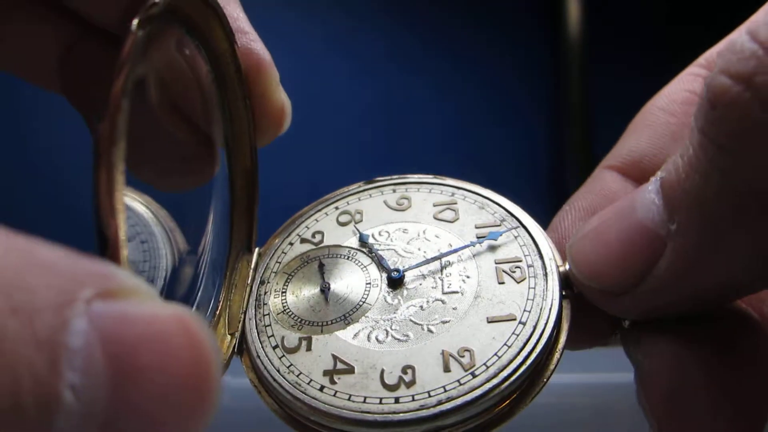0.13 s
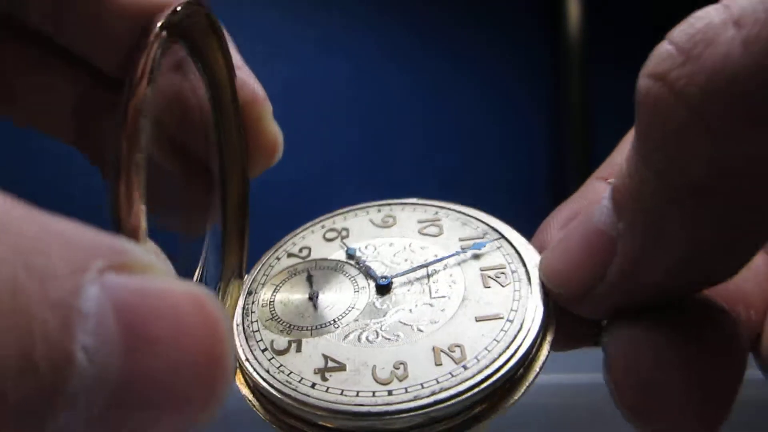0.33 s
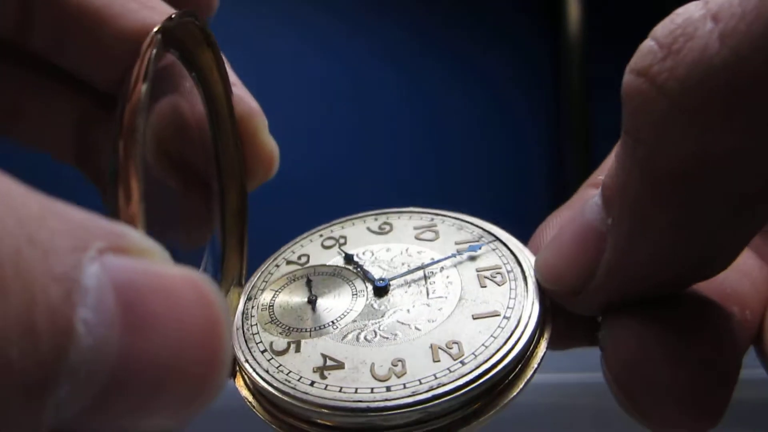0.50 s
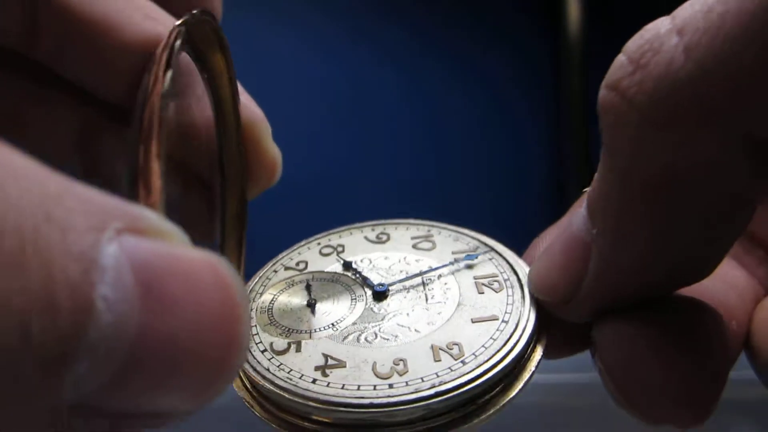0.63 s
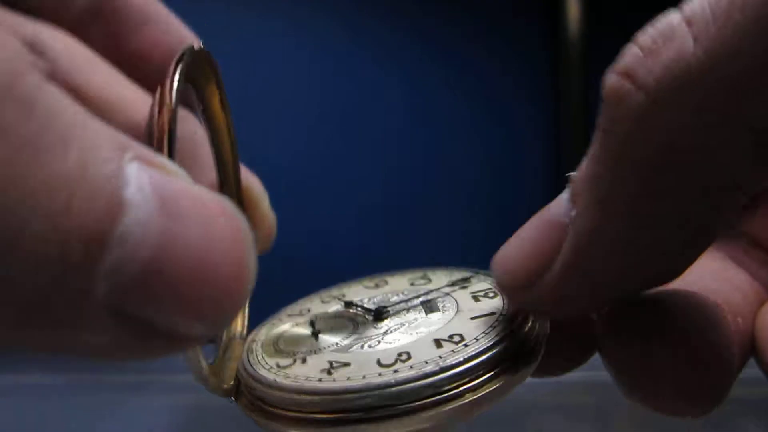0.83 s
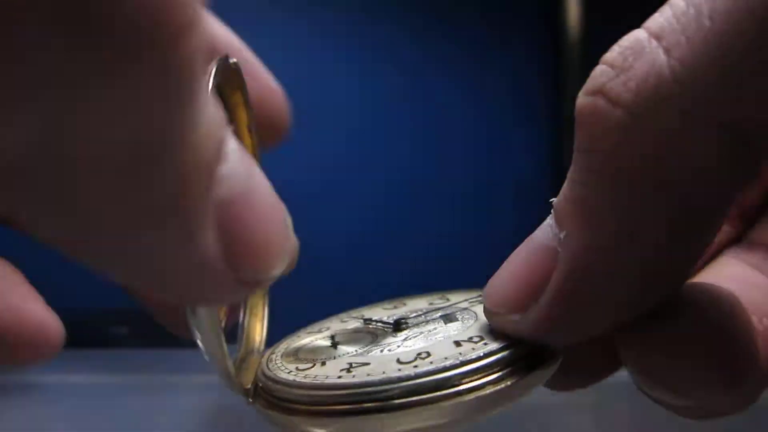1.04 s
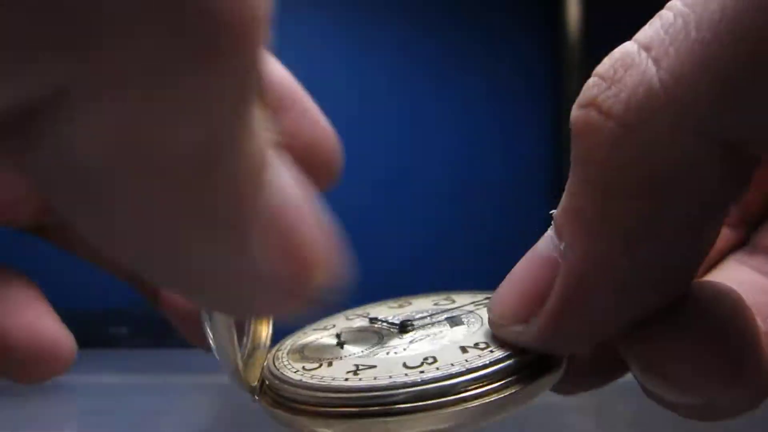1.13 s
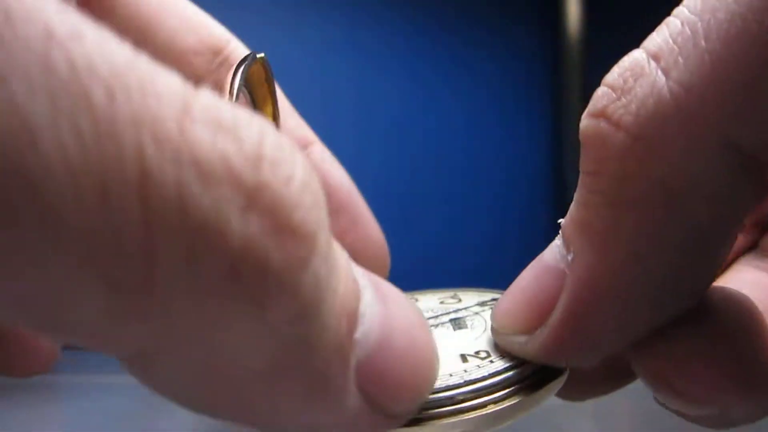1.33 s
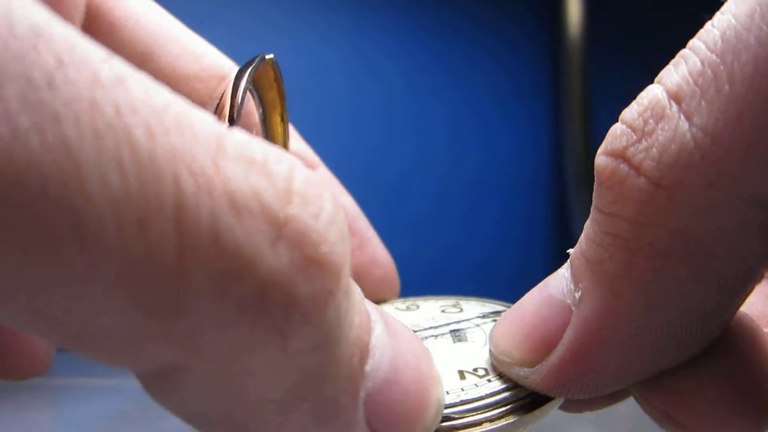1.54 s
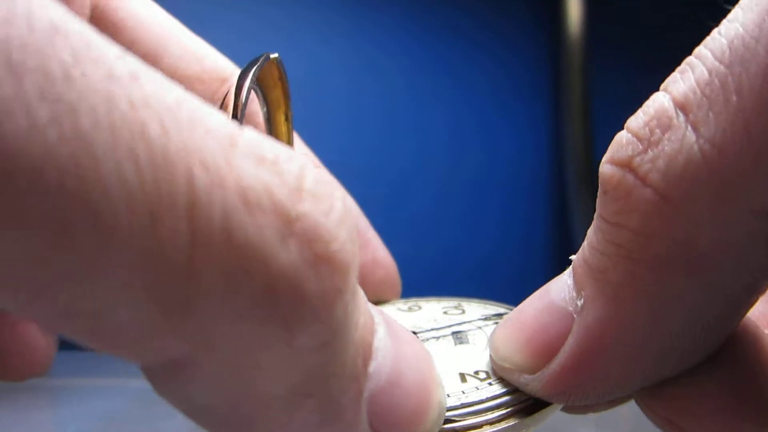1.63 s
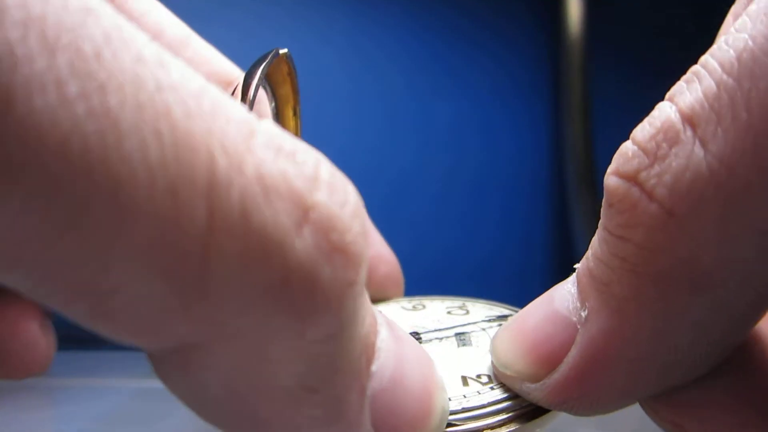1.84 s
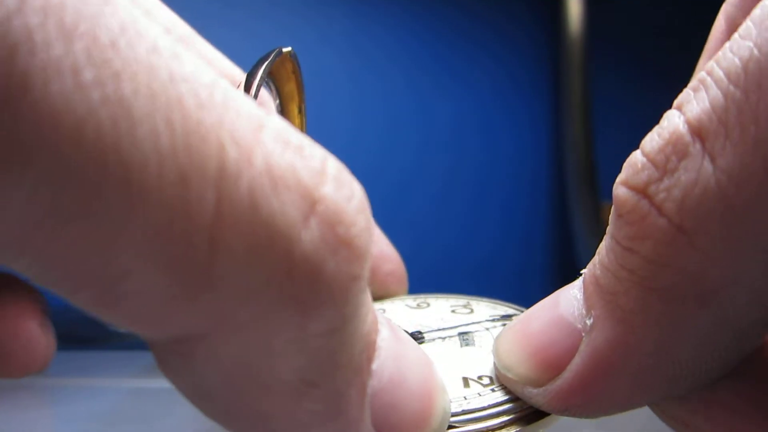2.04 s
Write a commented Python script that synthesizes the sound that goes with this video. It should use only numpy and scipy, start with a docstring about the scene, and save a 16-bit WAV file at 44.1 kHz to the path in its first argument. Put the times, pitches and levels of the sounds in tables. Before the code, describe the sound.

A pocket watch's metal cover clicks and snaps close by in a small quiet room. At 0.2 seconds comes a knock with a brief bright ring. Lighter clicks and taps follow around 0.7, 0.9 and 1.2 seconds, with soft fingertip rubbing. The loudest, sharpest snap lands near 1.5 seconds and a second at 1.6. Very faint ticking, five beats a second, runs underneath with low room noise.

```python
"""A faint tick and a rub of fingertips, then a pocket watch's hinged cover snaps and rings close by.
Fingers knock and rub the case, each impact exciting its damped modes, while the escapement ticks five
times a second in a small quiet room. The background drops out briefly before the second snap.
Gain control ducks the sound after the snaps and lets the room noise return slowly."""
import sys
import numpy as np
from scipy import signal
from scipy.fft import rfft, irfft
from scipy.io import wavfile
from scipy.ndimage import uniform_filter1d

SR = 44100
rng = np.random.default_rng(int(sys.argv[2]) if len(sys.argv) > 2 else 0)


def generate_wav(signal):
    """Clip the signal to [-1, 1] and save it as 16-bit WAV at the path in sys.argv[1]."""
    frames = np.transpose(np.atleast_2d(signal))
    scaled = np.clip(frames, -1, 1) * 32767
    pcm = np.round(scaled).astype(np.int16)
    wavfile.write(sys.argv[1], SR, pcm)


N = 92610


def contacts():
    """Impact excitation: the case rings and rattles. Returns the direct sound and the feed to the room."""
    # contacts on the case: (time [s], rise [s], rattle length factor, ring pitch factor,
    # then level [dB] in each band: push, thump, knock, clack, click, snap, fizz)
    impacts = [ (0.2117, 0.00031, 1.06, 0.74, -42, -22.5, -28, -28.5, -24, -38, -46),
               (0.2137, 0.00069, 1.3, 1.01, -28, -14.5, -25, -20, -26, -23, -28.5),
               (.2335, .0005, .8, 1., -70, -67, -55, -47, -53, -60, -54),
               (0.408, 0.00077, 1.4, 0.71, -64, -55, -62.5, -70, -57, -74, -77),
               (.7263, 0.00037, 0.86, .97, -56, -30.5, -30.5, -51, -69, -48.5, -55),
               (.7670, 0.00038, 1.3, 1.05, -67, -34.5, -53, -49, -62, -62, -72),
               (.8695, 0.0001, 1.6, .9, -56, -29, -50, -34, -38.5, -38, -49),
               (.8738, 0.00016, 1.74, .95, -53, -27.5, -34, -40, -45.5, -41.5, -57),
               (1.1152, 0.00026, 0.8, 1., -67, -60, -68, -59.5, -54, -55.5, -63),
               (1.1363, .001, 3.3, .9, -35.5, -40, -48, -59, -51, -73, -65),
               (1.1810, 0.0011, 1.2, 1., -56, -40.5, -48.5, -50.5, -59, -60, -77),
               (1.1980, 0.00021, 2.3, .72, -46, -41, -36.5, -62, -70, -75, -72),
               (1.4686, 0.000033, 0.54, 0.96, -24, -34.5, -23.5, -18.5, -22.5, -26, -30.5),
               (1.4697, 0.00061, 0.92, 0.63, -23, -22.5, -46, -29, -28, -33, -34.5),
               (1.6132, 0.00024, 0.91, 1., -54, -28.5, -21, -16, -32.5, -36, -43),
               (1.773, 0.00032, .7, 1., -51, -66, -53.5, -59, -76, -72, -68), ]
    # response of each band: (low edge [Hz], high edge [Hz], rattle t60 [s],
    # rattle gain [dB], ring gain [dB], room gain [dB])
    bands = [(25, 136, 0.024, -11, -8, -21), (137.4, 325, .035, -1.5, -1, -17.5),
             (306, 767, 0.022, -2, 0.5, -13.5), (890, 2100, .018, -4, 1, -20),
             (2200, 4440, 0.017, -3.5, -8, -22), (4900, 7500, 0.0056, -6, -16.5, -30),
             (8360, 13400, .012, -2.5, -17, -22)]
    # modes of the watch held against the table: (frequency [Hz], relative level [dB], t60 [s])
    body_modes = [(70, 0, .018), (162, -6, 0.016), (257.4, -7.5, 0.044), (422, -4.5, 0.038),
                  (515, 4.5, 0.038), (691, 6.5, 0.045), (1091, 7, 0.011), (1317, 1, 0.02),
                  (1664, -4.5, 0.0074), (2063, -32, 0.042), (2650, 7, 0.013), (3360, -13, 0.02),
                  (3674, -3, 0.039), (4920, -8.5, 0.011), (5000, -21, 0.005), (6440, -9, 0.025),
                  (8960, 13.5, 0.0083), (11300, -9, 0.011), (12290, -13, 0.01)]
    direct, to_room, t = np.zeros(N), np.zeros(N), np.arange(8192) / SR
    impulse = 1. * (t == 0)
    for time, rise, length, pitch, *levels in impacts:
        onset = 1 - np.exp(-t / rise)
        for db, (low, high, t60, rattle_db, ring_db, room_db) in zip(levels, bands):
            bandpass = signal.butter(2, [low, high], "band", fs=SR, output="sos")
            bass_cut = signal.butter(2, 0.91 * low, "high", fs=SR)
            chatter = rng.standard_normal(len(t)) * onset * amp(-60 * t / (t60 * length))
            rattle = burst(signal.sosfilt(bandpass, chatter))
            modes = [mode for mode in body_modes if low <= mode[0] < high]
            body = burst(signal.lfilter(*bass_cut, onset * ring(modes, t, pitch)))
            add(direct, time, amp(db + rattle_db) * rattle + amp(db + ring_db) * body)
            pulse = signal.sosfilt(bandpass, signal.sosfilt(bandpass, impulse))
            add(to_room, time, amp(db + room_db) * burst(pulse))
    return direct, to_room


def stops():
    """Sudden deceleration: catch and cover each radiate one pressure pulse on hitting their stops."""
    # hard stops of metal on metal: (time [s], pulse width [s], level [dB])
    hits = [(1.4686, 0.00021, -4.5), (1.614, 0.00027, -16)]
    out, t = np.zeros(N), np.arange(1024) / SR
    for time, width, db in hits:
        u = t / width
        add(out, time, -amp(db) * (1 - u) * np.exp(-u))
    return out


def cover(fast_t60=0.043, linger_db=-23):
    """Free vibration: the thin sprung cover loses most of its ring at once, then lingers faintly."""
    # the cover left free to ring: (time [s], level [dB])
    clinks = [(0.2169, -22), (0.8746, -53)]
    # modes of the cover: (frequency [Hz], relative level [dB], t60 of the lingering ring [s])
    modes = [(2075, -11.5, 0.52), (3080, 0, 0.18), (5216, -26, .19), (6765, 1, 0.25), (7881, -22, .22),
             (8269, -18, .19), (10480, -20, 0.29), (14880, -19, .14)]
    out, t = np.zeros(N), np.arange(SR // 2) / SR
    damping = amp(-60 * t / fast_t60) + amp(linger_db)
    for time, db in clinks:
        add(out, time, amp(db) * damping * ring(modes, t))
    return out


def tinks(rise_s=0.00027):
    """Damped oscillation: each struck part of the watch or its support gives one short note."""
    # struck parts: (time [s], frequency [Hz], level [dB], t60 [s])
    notes = [(.2140, 242.7, -6.5, 0.033), (0.213, 560, -22, 0.031), (0.2343, 3200, -25.5, 0.012),
             (.7265, 1186, -29, 0.019), (0.871, 2650, -32, 0.026), (0.8723, 3070, -34, 0.011),
             (0.8718, 3680, -34, 0.022), (0.8741, 245, -22.5, 0.035), (1.1132, 2620, -42.5, 0.02),
             (1.1145, 11840, -45, 0.012), (1.1971, 423, -22, 0.015), (1.4687, 1340, -12.5, 0.013),
             (1.4715, 715, -14.5, 0.031), (1.471, 8470, -32, 0.02), (1.6139, 1770, -12, .012),
             (1.6140, 3640, -24.5, 0.024), (1.6140, 6700, -31, 0.022)]
    out, t = np.zeros(N), np.arange(4096) / SR
    onset = 1 - np.exp(-t / rise_s)
    for time, *mode in notes:
        add(out, time, onset * ring([mode], t))
    return out


def ticks(hold_s=0.0043, t60=0.018, ring_db=-7.5):
    """Periodic impact: every beat of the escapement gives a bright rattle with a trace of ring."""
    # beats of the escapement: (time [s], level [dB], ring frequency [Hz])
    beats = [(0.0182, -50, 8950), (0.4172, -52.5, 8660), (.6180, -60, 9200), (.8150, -52.5, 15300),
             (1.0200, -60, 8250), (1.2186, -48, 14600), (1.4222, -54, 10300), (1.619, -54, 9300),
             (1.8212, -58.5, 9270), (2.019, -50, 10670)]
    # spectrum of the rattle: (frequency [Hz], relative level [dB])
    spectrum = [(100, -34), (1000, 9), (3500, -4), (7500, -1), (9200, 7.5), (12500, -1.5), (15000, 2.5),
                (17000, -21)]
    out, t = np.zeros(N), np.arange(2048) / SR
    fade = amp(-60 * np.maximum(t - hold_s, 0) / t60)
    for time, db, hz in beats:
        rattle = noise(lambda f: amp(curve_at(spectrum, f)), len(t))
        tone = amp(ring_db) * 2 * np.sin(2 * np.pi * hz * t)
        add(out, time, amp(db) * burst(fade * (rattle + tone)))
    return out


def rubs(grain_db=3, grain_hz=150):
    """Sliding friction: skin on the case makes soft, grainy swells of noise."""
    # fingertip strokes: (time [s], duration [s], level [dB], spectral tilt [dB/octave])
    strokes = [(0.038, .17, -55, -2.5), (0.103, 0.062, -56.5, 8), (0.402, 0.047, -55, 5.5),
               (.64, 0.073, -56.5, -3), (0.781, 0.18, -53, -13), (0.894, 0.068, -63, -13),
               (1.132, 0.16, -71, 10), (1.374, 0.042, -55.5, -2), (2.042, 0.064, -56.5, -8)]
    # friction spectrum before the tilt: (frequency [Hz], relative level [dB])
    spectrum = [(40, -28), (200, -6.5), (600, 3.5), (1200, -2), (3000, -17), (6000, -35.5), (16000, -53)]
    out, t = np.zeros(N), np.arange(SR // 2) / SR
    for time, duration, db, tilt in strokes:
        hiss = noise(lambda f: amp(curve_at(spectrum, f) + tilt * np.log2(np.clip(f, 200, 5000))), len(t))
        grain = amp(grain_db * noise(lambda f: 1 / (1 + (f / grain_hz) ** 2), len(t)))
        swell = np.sin(np.pi * np.minimum(t / duration, 1))
        add(out, time, amp(db) * hiss * grain * swell)
    return out


def room(x, delay_s=0.0026, build_s=0.0055):
    """Reverberation: dense reflections form a short tail whose decay depends on frequency."""
    # reverberation time of the room: (frequency [Hz], t60 [s])
    decay_times = [(100, 0.3), (400, 0.37), (1200, 0.23), (4000, 0.29), (14000, 0.27)]
    hz, t, spectrogram = signal.stft(rng.standard_normal(SR // 2), SR, nperseg=256)
    decay = amp(-60 * t / curve_at(decay_times, hz)[:, None])
    tail = signal.istft(spectrogram * decay, SR, nperseg=256)[1]
    tail *= np.clip((np.arange(len(tail)) / SR - delay_s) / build_s, 0, 1)
    return signal.fftconvolve(x, tail / np.linalg.norm(tail))[:N]


def room_noise(broadband_db=-54):
    """Stationary noise: a low broadband bed, with narrow bands heard as hums and a thin whine."""
    # spectrum of the bed: (frequency [Hz], relative level [dB])
    spectrum = [(15, -41), (25, -10.5), (70, -8.5), (87, -6), (135, -2.5), (197, -6.5), (238, -8),
                (330, -14.5), (600, -16.5), (878, -17), (1090, -16.5), (2670, -26.5), (8140, -31.5),
                (15200, -39.5), (16500, -65)]
    # narrow bands: (centre frequency [Hz], bandwidth [Hz], level [dB])
    bands = [(120, 32, -66.5), (1102, 50, -69.5), (7910, 180, -75)]
    hums = sum(amp(db) * noise(lambda f: 1 / (1 + (2 * (f - hz) / width) ** 2), N)
               for hz, width, db in bands)
    return amp(broadband_db) * noise(lambda f: amp(curve_at(spectrum, f)), N) + hums


def ring(modes, t, pitch=1):
    """Modal synthesis: a struck object sounds as a sum of damped sines."""
    return sum(amp(db - 60 * t / t60) * np.sin(2 * np.pi * hz * pitch * t) for hz, db, t60 in modes)


def noise(shape, size):
    """Spectral shaping: unit-variance noise whose amplitude spectrum follows shape(frequency)."""
    white = rfft(rng.standard_normal(size))
    x = irfft(white * shape(np.fft.rfftfreq(size, 1 / SR)), size)
    return x / (x.std() + 1e-20)


def burst(x):
    """Energy normalisation: a short sound gets the energy of 5 ms at full level."""
    return x * np.sqrt(.005 * SR / (np.sum(x ** 2) + 1e-20))


def add(mix, time, sound):
    """Superposition: a sound joins the mix at a time in seconds."""
    part = mix[round(time * SR):][:len(sound)]
    part += sound[:len(part)]


def curve_at(points, hz):
    """Interpolation of (frequency [Hz], value) points on a logarithmic frequency axis."""
    f, value = np.transpose(points)
    return np.interp(np.log(hz + 1), np.log(f + 1), value)


def amp(db):
    """Amplitude ratio of a level in decibels."""
    return 10 ** (np.asarray(db) / 20)


def lag(x, tau_s):
    """Exponential smoothing: a one-pole low-pass with time constant tau_s."""
    pole = np.exp(-1 / (tau_s * SR))
    return signal.lfilter([1 - pole], [1, -pole], x)


def scene(stop_room_db=-18, dropout_start_s=1.407, dropout_end_s=1.467, dropout_db=-54):
    """Superposition of watch, reverberation and background; room noise and rubs drop out briefly."""
    t = np.arange(N) / SR
    direct, to_room = contacts()
    cracks = stops()
    watch = direct + cracks + tinks() + cover() + ticks()
    reverberation = room(to_room + amp(stop_room_db) * cracks)
    in_gap = (t > dropout_start_s) & (t < dropout_end_s)
    dropout = uniform_filter1d(np.where(in_gap, amp(dropout_db), 1.), size=64)
    return (watch + reverberation + (room_noise() + rubs()) * dropout)[None]


def record(dry, threshold_db=-32, reduction_db_per_db=0.56, recovery_db_per_s=17,
           detector_hz=1510, cutoff_hz=16500):
    """Dynamic compression: the gain falls after loud snaps and recovers slowly; a low-pass follows."""
    sensed = lag(dry[0], 1 / (2 * np.pi * detector_hz))
    power = lag(sensed ** 2, tau_s=0.033)
    excess_db = np.maximum(10 * np.log10(power + 1e-12) - threshold_db, 0)
    # each peak of the excess is held and falls away at a steady rate
    fall_db = np.arange(N) * recovery_db_per_s / SR
    held_db = np.maximum.accumulate(excess_db + fall_db) - fall_db
    ducked = dry * amp(-reduction_db_per_db * lag(held_db, tau_s=0.035))
    lowpass = signal.firwin(201, cutoff_hz, window=("kaiser", 8), fs=SR)
    return signal.oaconvolve(ducked, lowpass[None], "same")


dry = scene()
out = record(dry)
generate_wav(out)
```